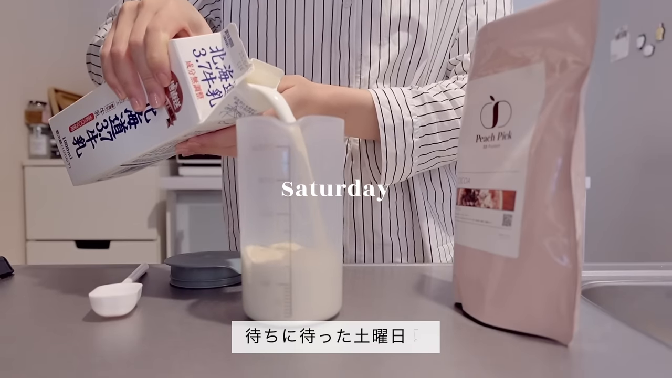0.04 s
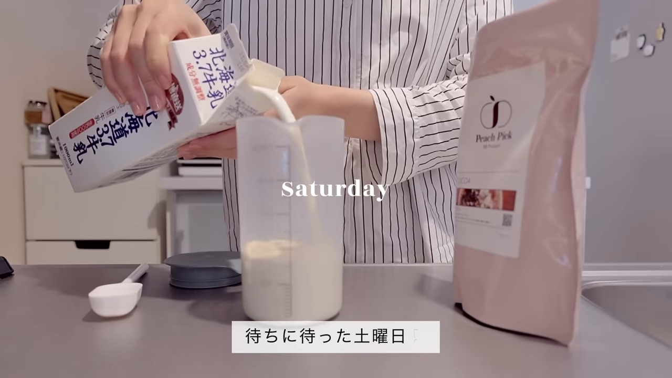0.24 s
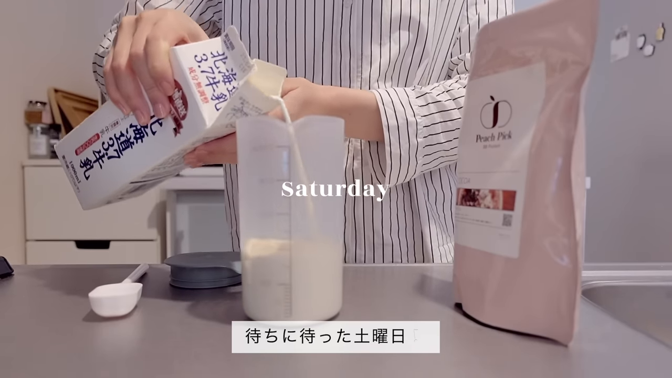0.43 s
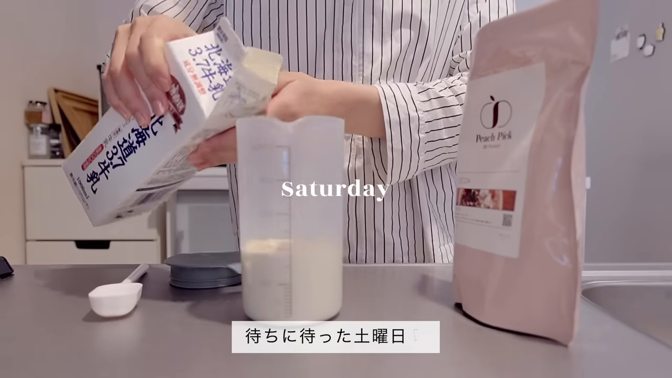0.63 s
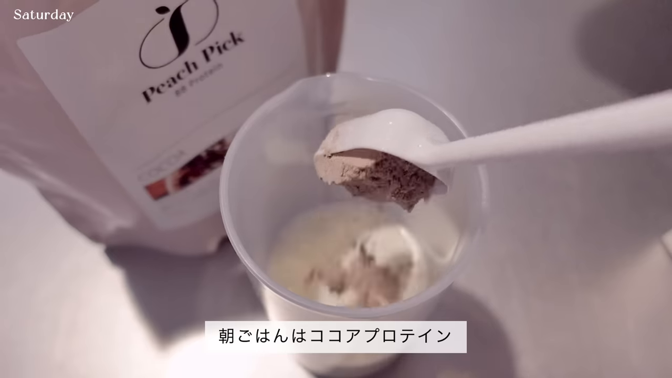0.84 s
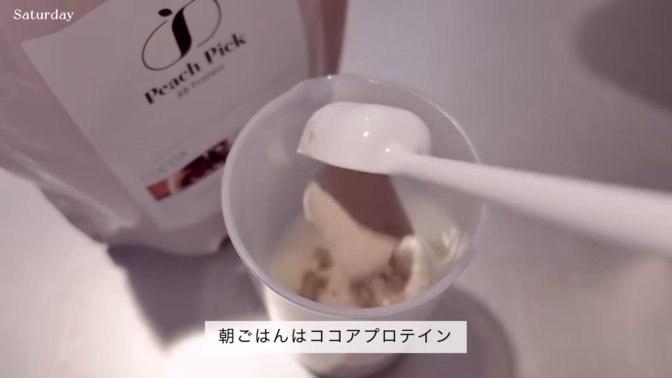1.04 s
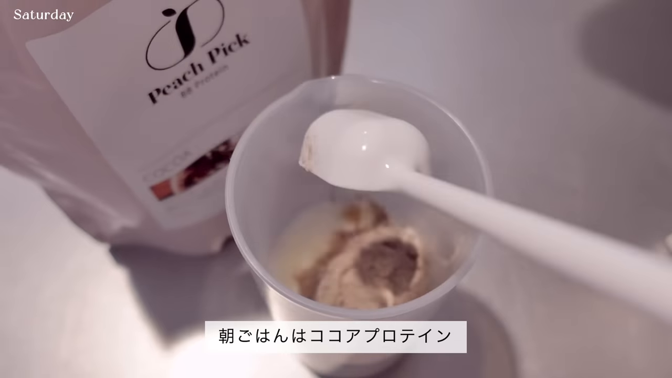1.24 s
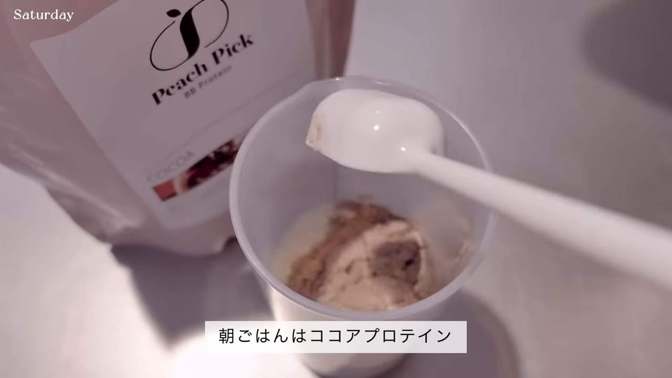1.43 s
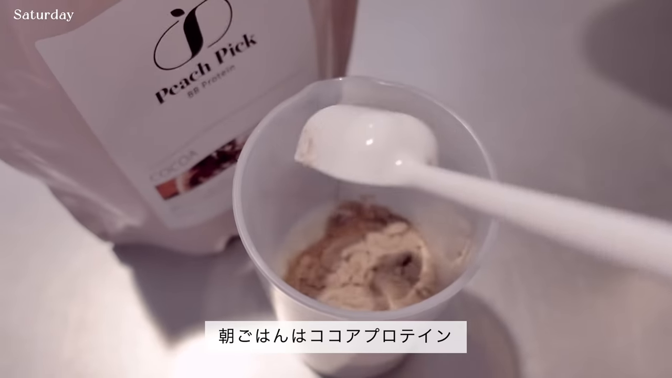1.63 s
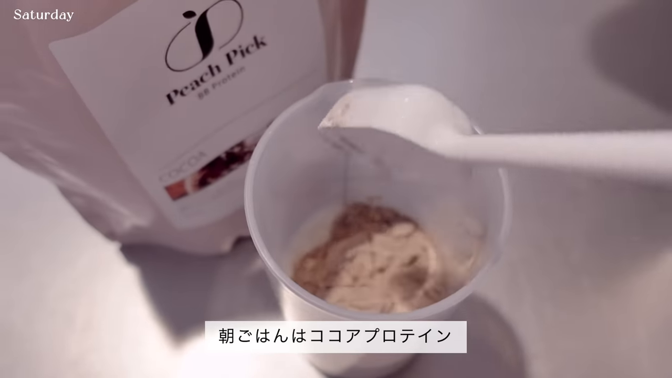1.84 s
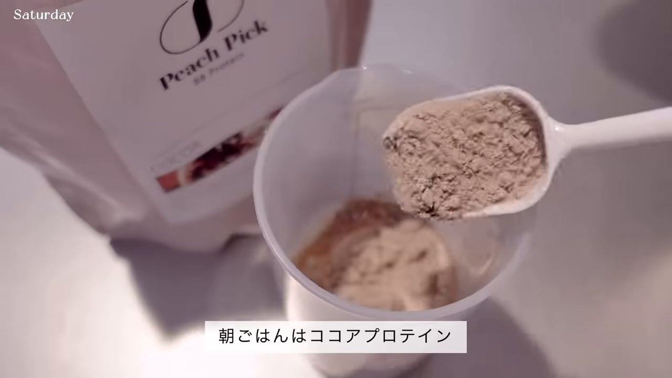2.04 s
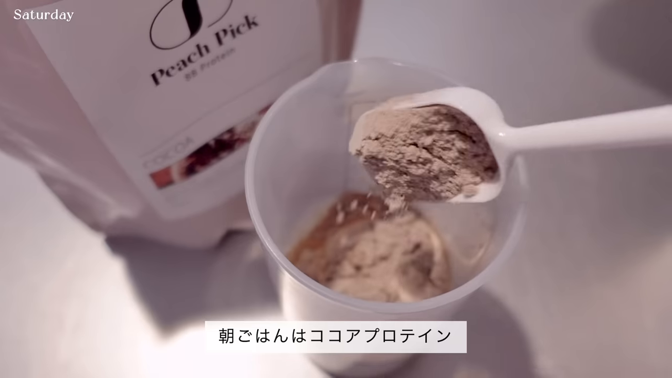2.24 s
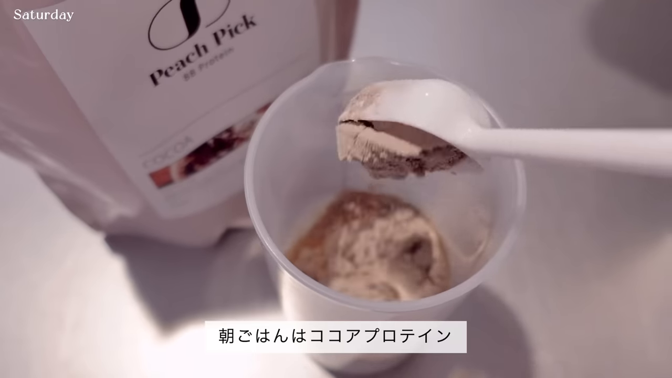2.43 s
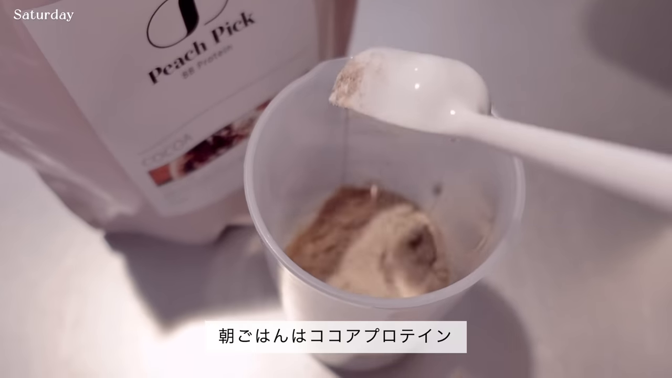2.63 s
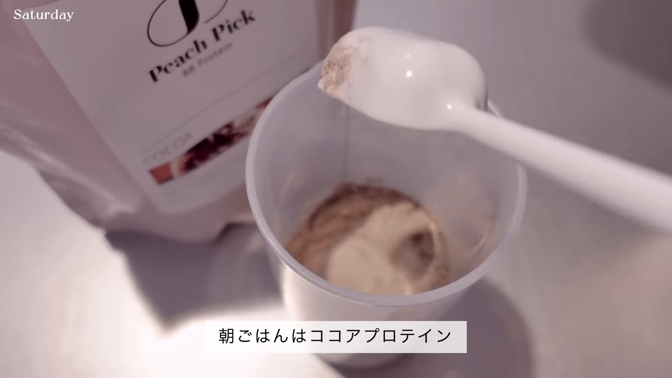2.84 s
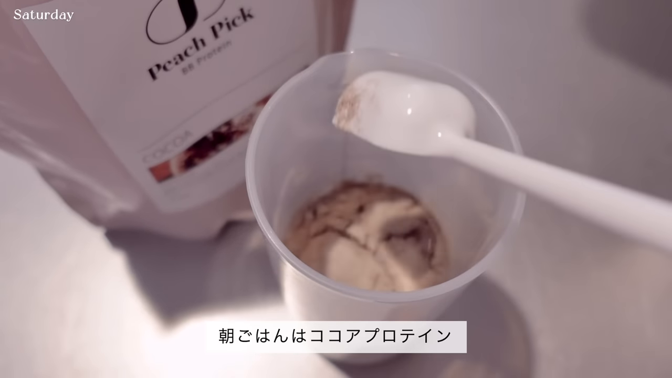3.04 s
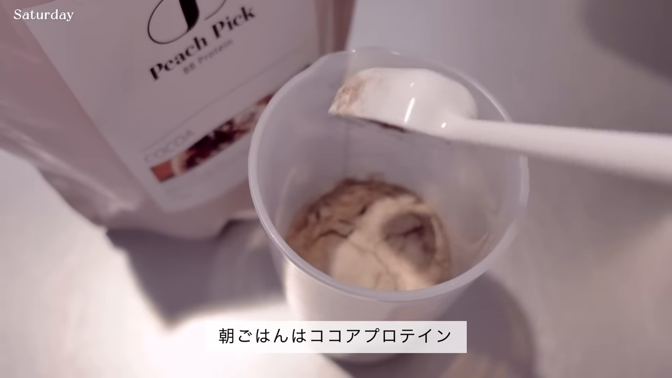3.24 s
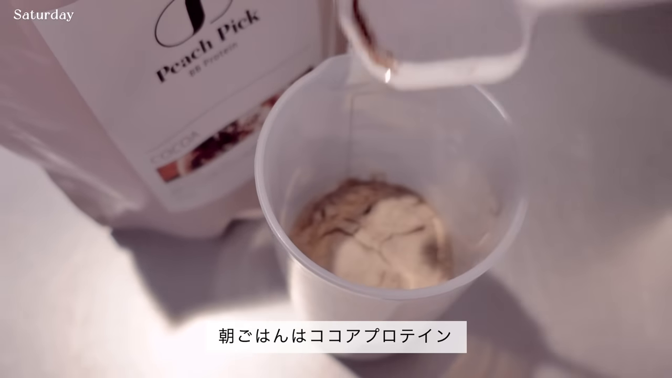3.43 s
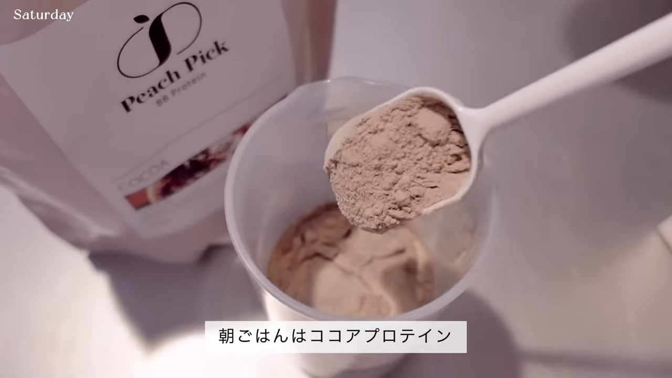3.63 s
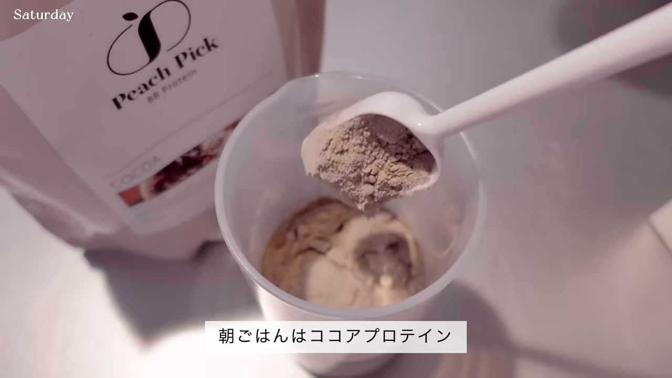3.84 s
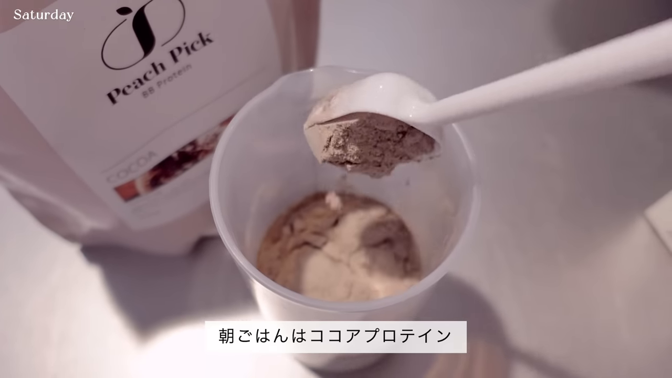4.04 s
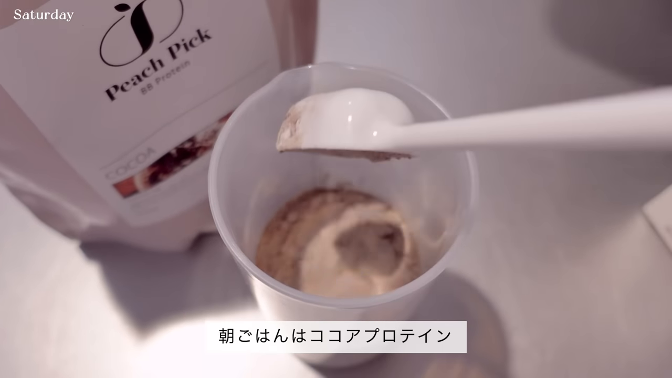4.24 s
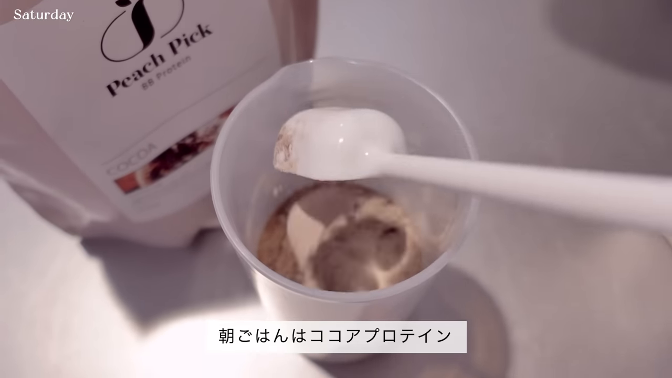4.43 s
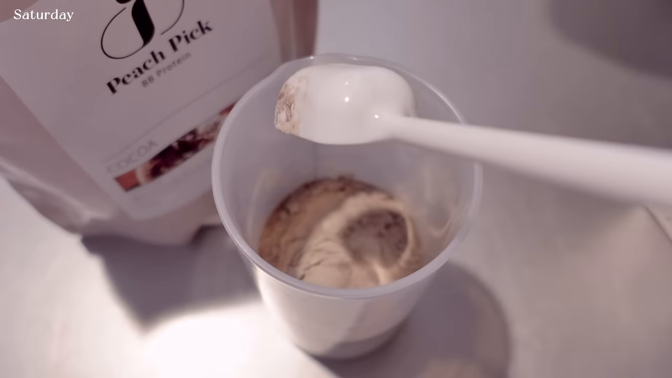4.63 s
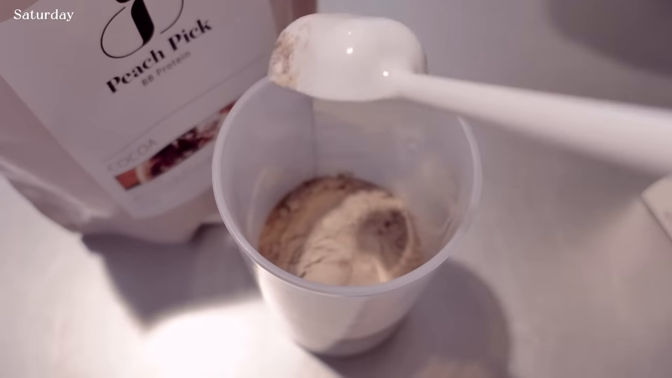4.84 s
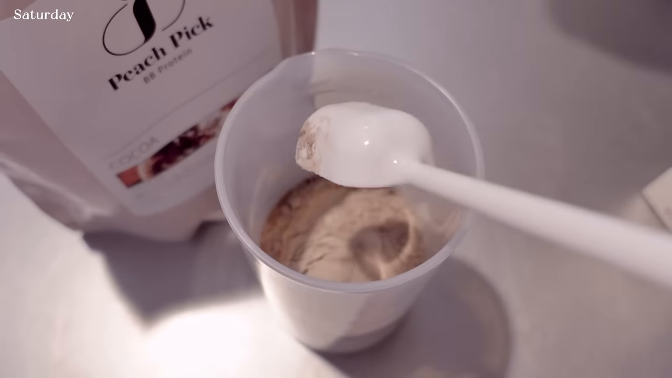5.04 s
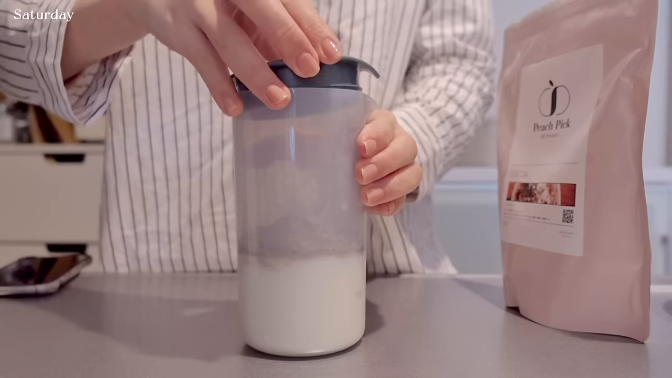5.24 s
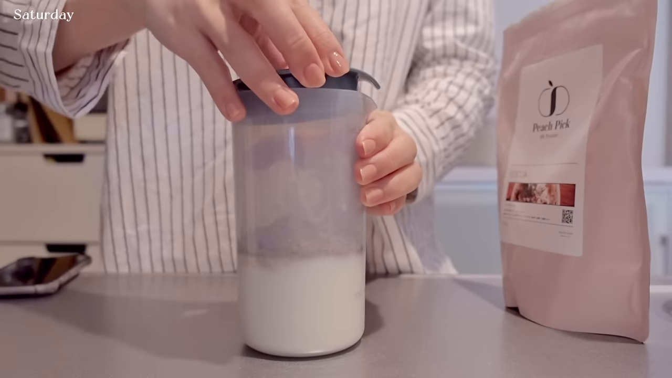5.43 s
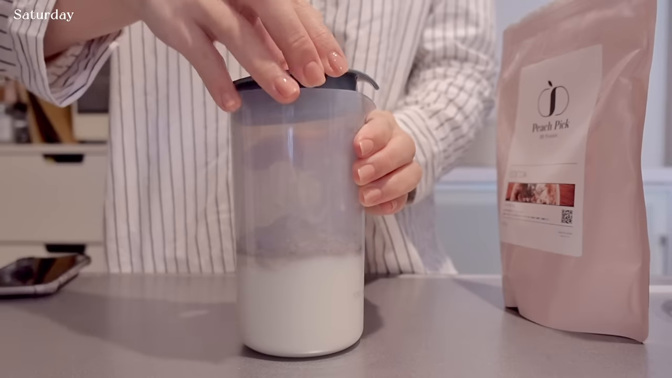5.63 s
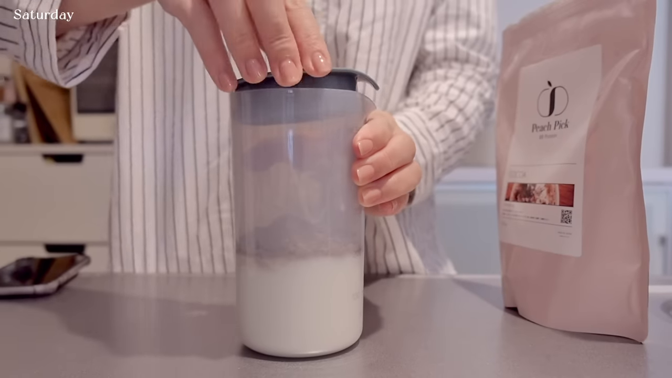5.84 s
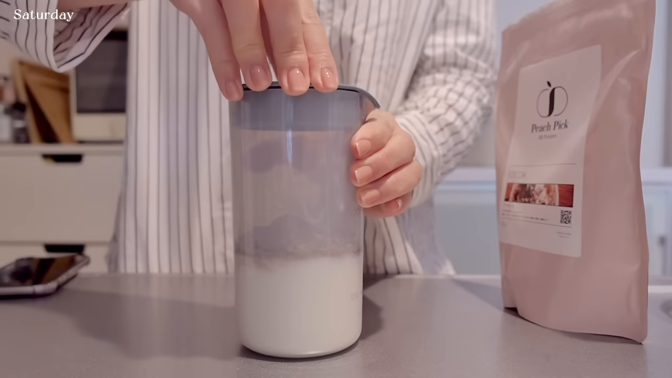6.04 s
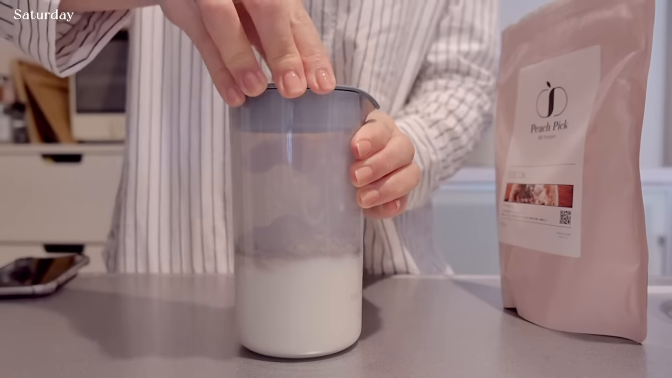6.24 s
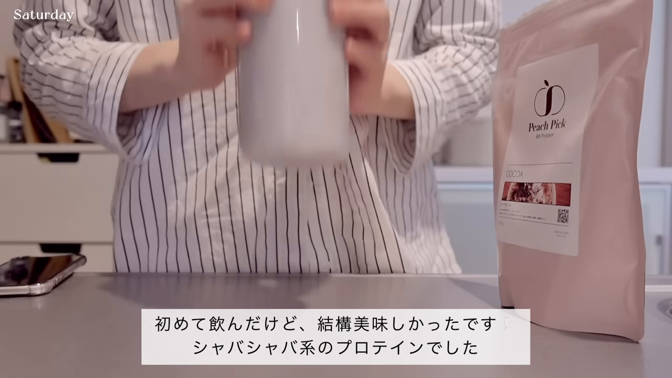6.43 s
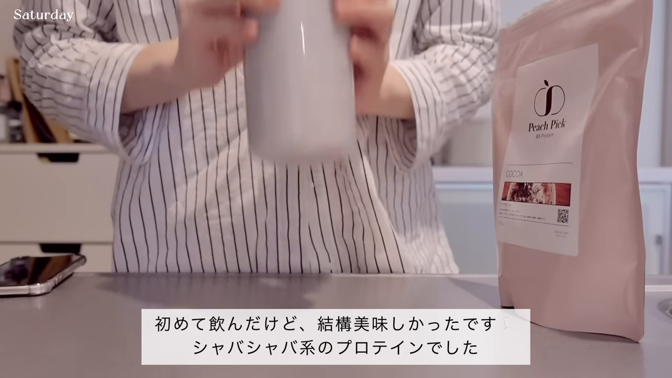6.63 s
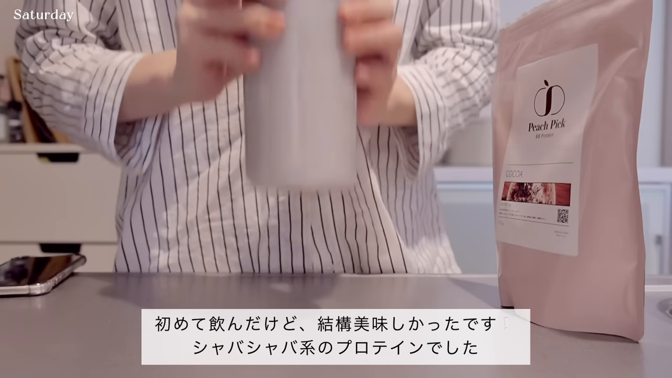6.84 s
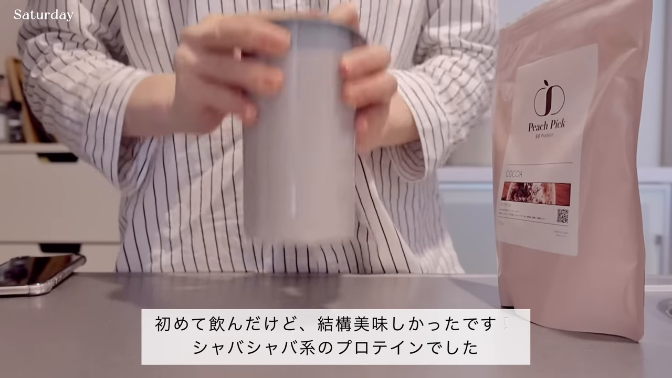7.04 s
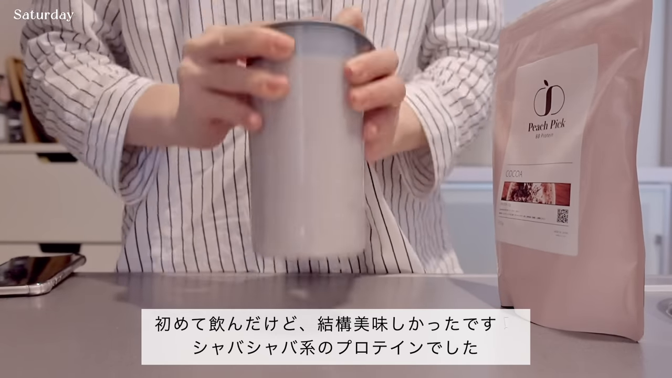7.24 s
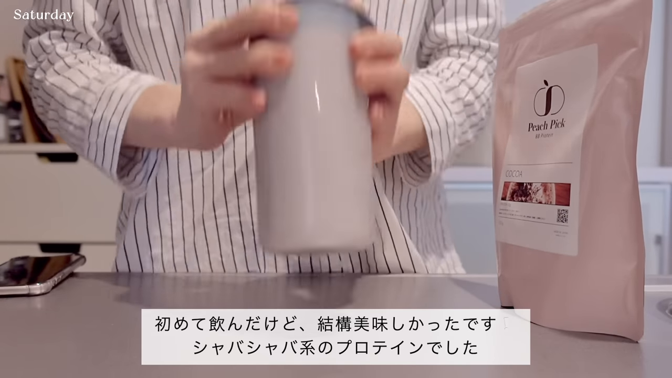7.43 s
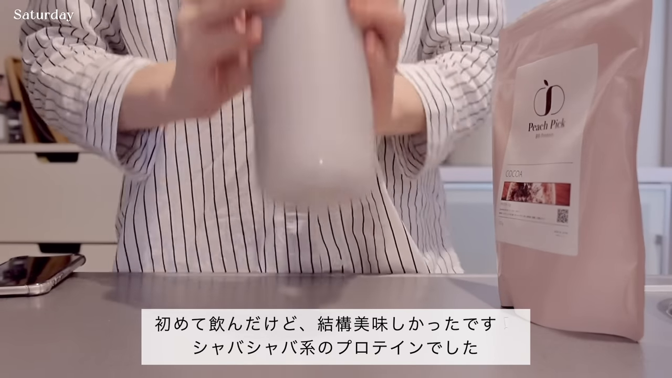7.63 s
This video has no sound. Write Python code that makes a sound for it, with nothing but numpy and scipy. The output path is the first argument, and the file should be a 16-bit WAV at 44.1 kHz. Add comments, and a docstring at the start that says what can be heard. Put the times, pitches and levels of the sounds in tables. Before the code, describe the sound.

Close, fairly dry sound in a small kitchen with faint steady room noise. From 0 to 0.6 s, a few tiny, high milk drips plink into a plastic cup, with a light carton click at 0.24. Dull taps and small clicks follow from 0.66; a hollow knock at 1.14 accompanies the first faint patter of powder. Soft low bumps of the jiggled scoop lead to a sharp, strong plastic snap at 2.05, a lesser one at 2.12. The second scoop brings hollow taps at 2.6 and a fuller knock at 2.85; the third, very faint, taps around 4.25 and 4.5. At 5.2 the lid knocks on, rubs quietly in its thread and thumps shut at 6.0. From 6.37 to the end near 7.7, loud shaking: nearly five hard strokes per second, with bright wet slaps, gulping air and spray, each answered by a softer, fizzy swing back.

```python
"""A protein drink is made on a kitchen counter. First the last milk drips into a plastic shaker cup: splashes
and tiny ringing bubbles. Then three scoops of powder patter in as fine grains, and the scoop is tapped empty
on the rim with snaps of plastic and hollow notes of the cup's air. The lid is set on, screwed down with stick
and slip rubs, and pressed shut. Last the cup is shaken hard, nearly five times a second: each time a strong
stroke and a softer, frothy swing back, made of spray, gulps of trapped air, fizz and slaps."""
import sys
import numpy as np
from scipy import signal
from scipy.io import wavfile
from scipy.ndimage import uniform_filter1d

SR = 44100
rng = np.random.default_rng(int(sys.argv[2]) if len(sys.argv) > 2 else 0)


def inscribe(sig):
    """Save sig as 16-bit PCM at rate SR to the path in sys.argv[1].

    A 1-D sig is mono; a 2-D sig holds one channel per row.
    Samples are clipped to [-1, 1] before scaling.
    """
    pcm = np.round(np.clip(np.atleast_2d(sig).T, -1, 1) * 32767)
    wavfile.write(sys.argv[1], SR, pcm.astype(np.int16))


N = 339570
TIME = np.arange(N) / SR
RING_TIME = TIME[:SR // 3]
BINS = np.fft.rfftfreq(4096, 1 / SR)  # frequencies at which filter curves are drawn, Hz

# colour of the liquid on the walls: [f/Hz, level/dB]
SPRAY_SPECTRUM = [(60, -70), (200, 1), (400, -8), (900, -8), (2000, -0.5), (3200, -7), (5000, -5.5),
                  (7500, -6.5), (9800, -19.5), (15500, -27)]
# colour of the fine fizz: [f/Hz, level/dB]
FIZZ_SPECTRUM = [(1000, -33), (3000, -9), (4500, 10), (7600, 1), (9800, -19), (15500, -18)]
SHAKE_START_S = 6.369


def shaking(churn_db=-47, churn_gulp_db=-54, spray_db=-3, gulp_db=-2, fizz_db=-4, gulp_briefness=0.93):
    """Each surge throws spray on the walls and squeezes the trapped air; the hardest ones slap."""
    # powers add: the surges ride on a steady churning
    spray_power, gulp_power, fizz_power = amp(churn_db) ** 2, amp(churn_gulp_db) ** 2, 0
    for surge, db, air_db, fine_db in surges():
        spray_power = spray_power + (amp(db) * surge) ** 2
        gulp_power = gulp_power + (amp(air_db) * surge ** gulp_briefness) ** 2
        fizz_power = fizz_power + (amp(fine_db) * surge) ** 2
    liquid = evened(colour(froth(), read(SPRAY_SPECTRUM, BINS))) + .85 * bubbles()
    droplets = evened(colour(crackle(per_s=5900, spread_db=3.0), read(FIZZ_SPECTRUM, BINS)))
    spray = amp(spray_db) * np.sqrt(spray_power) * liquid
    fizz = amp(fizz_db) * np.sqrt(fizz_power) * droplets
    gulps = amp(gulp_db) * np.sqrt(gulp_power) * air_pocket()
    shaken = TIME > SHAKE_START_S
    return cup_walls(shaken * (spray + fizz + splashes(liquid) + gulps) + slaps())


# strong strokes throw the drink against one end of the cup:
# [t/s at the crest, spray level/dB, rise/s, trapped-air gulp level/dB, splash f/Hz]
STRONG_STROKES = [(6.409, -27.5, 0.009, -28, 1100), (6.604, -25, 0.0063, -24.5, 1090),
                  (6.824, -25, 0.0095, -25, 805), (7.034, -25, 0.012, -27.5, 1620),
                  (7.266, -27.5, 0.0056, -26, 1250), (7.479, -26, 0.0025, -30.5, 1500),
                  (7.70, -38, 0.016, -32.5, 1900)]
# softer swings back: [t/s at the crest, spray level/dB, gulp level/dB]
SWINGS_BACK = [(6.478, -33, -60), (6.712, -33.5, -40), (6.935, -34.5, -47.5), (7.164, -35, -36.5),
               (7.364, -35.5, -36.5), (7.567, -35, -38)]
# rises and falls are time constants
STROKE_HOLD_S, STROKE_FALL_S = 0.0072, 0.023
RETURN_RISE_S, RETURN_HOLD_S, RETURN_FALL_S = 0.014, 0.027, 0.044
# fine fizz against the spray: the swing back is frothier (dB)
STROKE_FIZZ_DB, RETURN_FIZZ_DB = -14.5, -8


def surges():
    """Every surge of the drink as (envelope, spray dB, gulp dB, fizz dB)."""
    out = []
    for s, db, rise, air_db, _ in STRONG_STROKES:
        surge = held(s, s + STROKE_HOLD_S, rise, STROKE_FALL_S)
        out.append((surge, db, air_db, db + STROKE_FIZZ_DB))
    for s, db, air_db in SWINGS_BACK:
        surge = held(s, s + RETURN_HOLD_S, RETURN_RISE_S, RETURN_FALL_S)
        out.append((surge, db, air_db, db + RETURN_FIZZ_DB))
    return out


def splashes(liquid, level_db=-3, sharpness=1.1):
    """Each strong stroke brings out a broad band of the liquid's sound at its own pitch."""
    out = np.zeros(N)
    for s, db, rise, _, hz in STRONG_STROKES:
        ratio = (BINS + 1) / hz
        band_db = -10 * np.log10(1 + (sharpness * (ratio - 1 / ratio)) ** 2)
        surge = held(s, s + STROKE_HOLD_S, rise, STROKE_FALL_S)
        out += amp(db + level_db) * colour(surge * liquid, band_db)
    return out


def froth(count=24, cycles=1.4):
    """A cloud of bursting bubbles and droplets; each size comes in its own clumps."""
    out = np.zeros(N)
    for hz in np.geomspace(300, 14000, count):
        bursts = crackle(per_s=220 + hz / 9, spread_db=3.0) * flutter(depth_db=4, length_s=.02)
        burst_sound = pop(hz, cycles)[:SR // 20]
        out += np.sqrt(hz) * evened(signal.oaconvolve(bursts, burst_sound)[:N])
    return evened(out)


def bubbles(count=28, cycles=7, glide=0.036):
    """Larger bubbles ring for a few milliseconds, rising in pitch as they surface."""
    out = np.zeros(N)
    for hz in np.geomspace(450, 4800, count):
        age = RING_TIME[:SR // 8] * hz / cycles
        envelope = (1 - np.exp(-4 * age)) * np.exp(-age)
        plink = envelope * np.sin(2 * np.pi * cycles * age * (1 + glide * age / 2))
        out += evened(signal.oaconvolve(crackle(per_s=16, spread_db=3), plink)[:N])
    return evened(colour(out, read(SPRAY_SPECTRUM, BINS)))


# colour of the squeezed air: [f/Hz, level/dB]
GULP_SPECTRUM = [(60, -18.5), (240, -13.5), (340, -4), (440, 0), (530, -1), (700, -7), (1500, -30),
                 (4000, -96)]


def air_pocket(wander_db=1.2):
    """The trapped air keeps changing shape, so its hollow note wanders in pitch."""
    speed = flutter(depth_db=wander_db, length_s=.06)
    return evened(np.interp(np.cumsum(speed), np.arange(N), hiss(GULP_SPECTRUM)))


# hard slaps of the drink on the cup's ends: [t/s, thump level/dB, f/Hz, crack level/dB]
END_SLAPS = [(6.37, -35.5, 676, -43), (6.394, -19.5, 1300, -27), (6.602, -3, 1190, -20.5),
             (6.707, -43, 1800, -23.5), (6.822, -15, 534, -31), (6.826, -18.5, 960, -24),
             (6.937, -18.5, 1970, -24.5), (6.9602, -33, 2020, -19), (7.001, -22.5, 1800, -25),
             (7.025, -13, 1690, -22), (7.166, -17.5, 1810, -32), (7.256, -18.5, 1440, -23),
             (7.473, -6, 2100, -13), (7.4802, -5.5, 1520, -35), (7.562, -26, 1920, -29.5),
             (7.698, -15, 1870, -21.5)]
# colour of a slap's crack: [f/Hz, level/dB]
CRACK_SPECTRUM = [(150, -11), (1000, -8.5), (2400, -0.5), (4000, -8), (7600, -7), (9800, -18.5),
                  (15500, -25.5)]


def slaps(crack_db=-6):
    """The mass of drink hits an end of the cup: one short pressure swing and a noisy crack."""
    out = np.zeros(N)
    for s, db, hz, crack in END_SLAPS:
        add(out, s, amp(db) * pop(hz, cycles=0.49))
        add(out, s, amp(crack + crack_db) * tick(CRACK_SPECTRUM, decay_s=0.0039, onset_s=0.00031))
    return out


# resonances of the filled cup: [f/Hz, width/Hz, level/dB]
WALL_RESONANCES = [(950, 170, 5), (1050, 74, -2.5), (1260, 70, 1.5), (1650, 51, -4.5), (1710, 110, 3.5),
                   (1753, 59, -6.5), (2230, 170, 2), (4240, 230, 1)]


def cup_walls(x):
    """The walls lift or dip narrow bands, and a cup in the air radiates little bass."""
    walls_db = sum(db / (1 + (2 * (BINS - hz) / width) ** 2) for hz, width, db in WALL_RESONANCES)
    small_body_db = -10 * np.log10(1 + (170 / (BINS + 5)) ** 2)
    return colour(x, walls_db + small_body_db)


# the milk carton once, then the scoop's edge, click on the rim:
# [t/s, clack level/dB, hardness = snap over clack level/dB]
EDGE_CLICKS = [(0.2378, -47.5, -11), (0.8114, -49.5, -6), (0.9021, -47, -0.5), (1.03, -48.5, 3),
               (1.0474, -58, 8), (1.1342, -45, -12), (1.6468, -54.5, -4), (2.0503, -22, -4.5),
               (2.115, -33, -1.5), (2.6307, -54, 0), (2.6954, -55, 3.5), (2.8566, -37, 1),
               (2.9737, -37, 13), (4.1024, -69, 19), (4.2642, -48.5, -7), (4.5047, -49.5, 3.5),
               (4.9162, -51, -7)]
# dull taps of carton and scoop on the cup: [t/s, air ring level/dB, ring f/Hz, counter thud level/dB]
DULL_TAPS = [(0.6631, -58, 700, -45.5), (0.9021, -43, 732, -68), (1.1426, -24, 724, -38),
             (2.5722, -36, 744, -44.5), (2.5995, -36, 765, -48), (2.8445, -23, 680, -25.5),
             (2.975, -60, 700, -34), (4.2433, -32, 740, -38), (4.4576, -40.5, 790, -41.5)]


def scoop(tap_clack_db=-17, click_ring_db=-6, skip_db=-28, skip_thud_db=12, skip_fade_db=-1.5,
          skip_s=.03, count=5):
    """Hollow taps, and sharp clicks on the rim after which the plastic skips a few times, ever softer."""
    out = np.zeros(N)
    for s, db, hz, thud_db in DULL_TAPS:
        add(out, s, blow(db + tap_clack_db, hard_db=-6, ring_db=db, thud_db=thud_db, ring_hz=hz))
    for s, db, hard_db in EDGE_CLICKS:
        add(out, s, blow(db, hard_db, ring_db=db + click_ring_db, thud_db=db))
        delays = np.cumsum(skip_s * (.5 + rng.random(count)))
        for k, delay in enumerate(delays):
            soft_db = db + skip_db + k * skip_fade_db
            skip = blow(soft_db, hard_db=2.5, ring_db=soft_db + click_ring_db, thud_db=soft_db + skip_thud_db)
            add(out, s + delay, skip)
    return out


# ringing of the air in the open cup, main note first: [f/Hz, level/dB, t60/s]
CUP_AIR_MODES = [(686, -1, 0.04), (736, -9, 0.03), (825, -20, 0.066), (670, -40, 0.065), (1210, -5, 0.012),
                 (2170, -43, 0.028)]
# ringing of the counter: [f/Hz, level/dB, t60/s]
COUNTER_MODES = [(99, -6.5, 0.085), (140.5, -12.5, 0.21), (210.4, -1.5, 0.14), (297.6, 0, 0.14),
                 (354, 0, 0.095), (394, 1.5, 0.08), (534, -1, 0.079), (600, 5.5, 0.04)]


def blow(db, hard_db, ring_db, thud_db, ring_hz=CUP_AIR_MODES[0][0], rattle_db=-27):
    """A blow snaps the plastic, which rattles briefly, rings the air in the cup and thuds in the counter."""
    snap = plastic(db, hard_db, decay_s=0.0014)
    rattle = amp(rattle_db) * plastic(db, hard_db, decay_s=0.0084)
    pitch = ring_hz / CUP_AIR_MODES[0][0]
    air = [(hz * pitch, mode_db, t60) for hz, mode_db, t60 in CUP_AIR_MODES]
    hollow = amp(ring_db) * ring(air, contact_s=0.0024)
    return snap + rattle + hollow + amp(thud_db) * ring(COUNTER_MODES)


# the three voices of struck plastic, from flexing wall to hard edge, each: [f/Hz, level/dB]
CLACK_SPECTRUM = [(150, -10), (700, 1), (1200, -7), (2200, 6.5), (3300, -0.5), (4300, -1), (6500, -44),
                  (10000, -34)]
SNAP_SPECTRUM = [(500, -57), (2500, -9.5), (4300, -1), (5100, 9), (6200, 11), (7600, 7.5), (8700, -2.5),
                 (9800, -20), (15500, -13)]
EDGE_SPECTRUM = [(3000, -2), (9300, -17), (11000, -7), (12800, -18), (14500, -12), (16000, -36)]


def plastic(db, hard_db, decay_s, edge_db=-17, edge_growth=1.45):
    """Struck plastic: the harder the contact, the more of its upper voices sound."""
    voices = [(0, CLACK_SPECTRUM), (hard_db, SNAP_SPECTRUM), (edge_db + edge_growth * hard_db, EDGE_SPECTRUM)]
    return sum(amp(db + voice_db) * tick(voice, decay_s) for voice_db, voice in voices)


# lid against the cup: [t/s, clack level/dB, hardness = snap over clack level/dB, thump level/dB]
LID_CONTACTS = [(5.1815, -41.5, -10, -28), (5.2906, -55, 13, -41), (5.8845, -62, 17, -30),
                (5.901, -46.5, 19, -46), (5.9946, -28.5, -0.5, -8.5), (6.133, -46.5, -2, -42.5)]
# ringing of the closed cup: [f/Hz, level/dB, t60/s]
CLOSED_CUP_MODES = [(117, -12, 0.098), (216, 4, 0.069), (280, 10.5, 0.025), (343, -18, 0.18),
                    (440, -10, 0.02), (623, -7, 0.051), (1426, -7.5, 0.021)]


def lid(push_db=-18):
    """The lid knocks on the cup and is screwed down by a rustling hand."""
    out = thread() + grip()
    for s, db, hard_db, thump_db in LID_CONTACTS:
        add(out, s, plastic(db, hard_db, decay_s=0.0021))
        add(out, s, amp(thump_db) * ring(CLOSED_CUP_MODES, contact_s=0.0028))
        # the hand's weight pushes into the counter
        add(out, s, amp(thump_db + push_db) * pop(hz=124, cycles=0.57))
    return out


# rubs of the lid turning in its thread: [t/s at the crest, level/dB, rise plus fall time constant/s]
THREAD_RUBS = [(5.192, -44.5, 0.015), (5.297, -41.5, 0.032), (5.40, -55, 0.04), (5.485, -56, .04),
               (5.636, -49.5, 0.036), (5.738, -53.5, 0.039), (5.931, -44, 0.064), (5.977, -36, .04),
               (6.068, -50, 0.044), (6.21, -57.5, .05)]
# colour of the slips in the thread: [f/Hz, level/dB]
THREAD_SPECTRUM = [(200, -38), (1000, -12), (2500, -11), (3500, -20), (4700, -9.5), (5700, -4), (6700, -7),
                   (7800, -0.5), (9300, -12.5), (11000, -14.5), (15500, -23)]
# colour of the low rumble under the rubs: [f/Hz, level/dB]
RUMBLE_SPECTRUM = [(50, -40), (130, -15), (230, 5.5), (450, -5), (700, -14), (1500, -19), (5000, -57)]
RUB_RISE_SHARE = 0.41


def thread(rumble_db=-4):
    """The thread sticks and rubs in many tiny slips over a low rumble."""
    power = 0
    for s, db, length in THREAD_RUBS:
        rub = swell(s, length * RUB_RISE_SHARE, length * (1 - RUB_RISE_SHARE))
        power = power + (amp(db) * rub) ** 2
    slips = evened(colour(crackle(per_s=5300, spread_db=3.0), read(THREAD_SPECTRUM, BINS)))
    slips = slips * flutter(depth_db=3.5, length_s=.012)
    return np.sqrt(power) * (slips + amp(rumble_db) * hiss(RUMBLE_SPECTRUM))


# the hand rests on the lid: [start t/s, end t/s]
HAND_ON_LID = (5.2, 6.37)
# the hand's faint rustle on the cup: [f/Hz, level/dB]
RUSTLE_SPECTRUM = [(100, -11), (220, 1), (330, -4.5), (452, 5), (650, -11.5), (1660, -10.5), (3500, -17),
                   (6000, -13), (15000, -30.5)]


def grip(grip_db=-58):
    """Skin on plastic: a faint, slightly uneven noise while the hand rests there."""
    resting = held(*HAND_ON_LID, rise=.008, fall=0.023)
    return amp(grip_db) * resting * flutter(depth_db=0.5, length_s=0.055) * hiss(RUSTLE_SPECTRUM)


# each scoopful slides into the cup: [start t/s, end t/s, patter level/dB, hollow tone level/dB]
SCOOPFULS = [(0.87, 1.27, -68.5, -63.5), (2.245, 2.68, -72, -67.5), (3.557, 4.202, -78, -62)]
# colour of the grains: [f/Hz, level/dB]
GRAIN_SPECTRUM = [(300, -47), (1500, -4), (4000, -0.5), (7800, 1), (9500, -8), (15500, -52)]
POUR_RISE_S, POUR_FALL_S = 0.18, 0.064  # time constants


def powder():
    """Fine grains patter into the cup."""
    flow = sum(amp(db) * held(start, end, POUR_RISE_S, POUR_FALL_S) for start, end, db, _ in SCOOPFULS)
    grains = evened(colour(crackle(per_s=900, spread_db=-0.5), read(GRAIN_SPECTRUM, BINS)))
    return flow * flutter(depth_db=8, length_s=0.034) * grains


# colour of the air in the open cup: [f/Hz, level/dB]
HOLLOW_SPECTRUM = [(300, -92), (580, -34.5), (625, 12.5), (645, 26), (675, 8), (720, -36), (1400, -33.5)]


def hollow_tone():
    """The faint, uneven tone of the air in the open cup during each pour."""
    tone = sum(amp(db) * held(start, end, POUR_RISE_S, POUR_FALL_S) for start, end, _, db in SCOOPFULS)
    return tone * flutter(depth_db=4.5, length_s=.04) * hiss(HOLLOW_SPECTRUM)


# the scoop is jiggled to loosen the powder:
# [start t/s, end t/s, mean spacing of bumps/s, level at start/dB, level at end/dB]
SCOOP_JIGGLES = [(1.196, 1.47, .076, -40, -51), (1.689, 2.04, .065, -48, -46.5)]
# the cup is nudged on the counter: [t/s, level/dB]
CUP_NUDGES = [(3.68, -46), (3.984, -52)]


def handling(bump_hz=151, nudge_hz=70):
    """Soft low pressure swings of the jiggled scoop and the nudged cup."""
    out = np.zeros(N)
    for start, end, step, first_db, last_db in SCOOP_JIGGLES:
        for s in np.arange(start, end, step):
            late, uneven_db = rng.uniform(-1, 1, 2) * [.007, 2]  # s, dB
            db = np.interp(s, [start, end], [first_db, last_db]) + uneven_db
            add(out, s + late, amp(db) * pop(bump_hz, cycles=1.27))
    for s, db in CUP_NUDGES:
        add(out, s, amp(db) * pop(nudge_hz, cycles=0.38))
    return out


# milk drips: [t/s, level/dB, bubble f/Hz]
MILK_DRIPS = [(0.0787, -39.5, 4790), (0.2, -53, 2350), (0.2116, -46.5, 4900), (0.2196, -40, 3690),
              (0.474, -42.5, 5550), (0.4744, -44, 3570), (0.565, -52, 2300), (0.5715, -39.5, 7550),
              (0.581, -45, 8200)]


def milk(level_db=-2, cycles=5.8, splash_db=-7):
    """Each drip splashes and traps a tiny bubble that rings."""
    out = np.zeros(N)
    for s, db, hz in MILK_DRIPS:
        splash = tick([(hz / 4, -20), (hz, 0), (hz * 2, -16)], decay_s=0.0021)
        add(out, s, amp(db + level_db) * pop(hz, cycles) + amp(db + splash_db) * splash)
    return out


# colour of the room's steady background: [f/Hz, level/dB]
AMBIENCE_SPECTRUM = [(15, -10), (25, 1), (137, -4.5), (249, -4), (363, -7), (451, -5), (516, -10.5),
                     (560, -8), (840, -11), (1230, -14), (2410, -19), (2910, -19.5), (3160, -21.5),
                     (16000, -26.5)]
AMBIENCE_DB = -60


def ambience():
    """A steady, quiet noise behind everything."""
    return amp(AMBIENCE_DB) * hiss(AMBIENCE_SPECTRUM)


# the kitchen's decay: [f/Hz, t60/s]
KITCHEN_DECAY = [(150, 0.23), (400, 0.25), (1200, 0.28), (3000, 0.34), (8000, .2), (15000, 0.033)]
# early echoes from counter and cupboards: [delay t/s, relative gain]
EARLY_ECHOES = [(.0017, 0.053), (.0052, 0.17), (.0087, 0.26), (0.0139, .18), (0.0193, 0.15)]


def kitchen(x, echo_db, tail_db):
    """Direct sound, a few early echoes and a short tail that dies fastest in the high treble."""
    hz, t, z = signal.stft(rng.standard_normal(SR // 2), SR, nperseg=256)
    decay = amp(-60 * t / read(KITCHEN_DECAY, hz)[:, None])
    tail = signal.istft(z * decay, SR)[1]
    tail = tail * np.minimum(TIME[:len(tail)] / 0.0031, 1)  # fades in over 3.1 ms
    response = amp(tail_db) * tail / np.linalg.norm(tail)
    add(response, 0, np.ones(1))  # direct sound
    for s, gain in EARLY_ECHOES:
        add(response, s, np.array([amp(echo_db) * gain]))
    return signal.oaconvolve(x, response)[:N]


def ring(modes, detune=0.016, contact_s=0.0013):
    """A struck body: dying sines, a little different at every blow; the air follows their rate of change."""
    t = RING_TIME
    motion = 0
    for hz, db, t60 in modes:
        struck_hz = hz * (1 + detune * (2 * rng.random() - 1))
        motion = motion + amp(db - 60 * t / t60) * np.sin(2 * np.pi * struck_hz * t) / hz
    contact = 1 - np.exp(-t / contact_s)
    return peaked(np.diff(motion * contact, prepend=0))


def pop(hz, cycles):
    """A short pressure swing whose envelope crests after the given cycles, then dies."""
    u = RING_TIME * hz / cycles
    return u * np.exp(1 - u) * np.sin(2 * np.pi * hz * RING_TIME)


def tick(spectrum, decay_s, onset_s=0.00039):
    """A short chatter of contacts with the given spectrum."""
    t = RING_TIME
    chatter = rng.choice([-1, 1], len(t)) * np.exp(-t / decay_s) * (1 - np.exp(-t / onset_s))
    x = colour(chatter, read(spectrum, BINS))
    return x / np.sqrt(np.sum(x ** 2) / (SR * decay_s))


def hiss(spectrum):
    """Steady noise of rms 1 with the given spectrum."""
    return evened(colour(rng.standard_normal(N), read(spectrum, BINS)))


def crackle(per_s, spread_db):
    """Random clicks of either sign; a positive spread makes a few stand out, a negative one a few softer."""
    size = amp(spread_db * np.minimum(rng.exponential(1, N), 4))
    return evened(size * rng.choice([-1, 1], N) * (rng.random(N) < per_s / SR))


def flutter(depth_db, length_s):
    """An uneven gain that wanders by chance, smoothed over length_s."""
    knots = np.arange(0, TIME[-1] + 1, .002)
    width = max(round(length_s / knots[1]), 1)
    wobble = uniform_filter1d(rng.standard_normal(len(knots)), width)
    return evened(amp(depth_db * np.interp(TIME, knots, evened(wobble))))


def held(start, end, rise, fall):
    """An envelope that climbs to 1, holds from start to end and dies away."""
    before, after = (start - TIME) / rise, (TIME - end) / fall
    return np.exp(-np.maximum(np.maximum(before, after), 0))


def swell(s, rise, fall):
    """An envelope that climbs to 1 at time s and dies away."""
    return held(s, s, rise, fall)


def colour(x, curve_db):
    """Causal minimum-phase filter with the given gain at each of BINS."""
    log_gain = np.log(amp(np.r_[curve_db, curve_db[-2:0:-1]]))
    taps = np.fft.ifft(np.exp(np.conj(signal.hilbert(log_gain)))).real
    return signal.oaconvolve(x, taps)[:len(x)]


def read(points, hz):
    """Reads a table on a log-frequency axis."""
    f, value = np.transpose(points)
    return np.interp(np.log(hz + 1), np.log(f + 1), value)


def add(mix, s, sound):
    """Mixes a sound in at time s."""
    part = mix[max(round(s * SR), 0):][:len(sound)]
    part += sound[:len(part)]


def amp(db):
    """Decibels to gain."""
    return 10 ** (np.asarray(db) / 20)


def evened(x):
    """Scales to rms 1."""
    return x / np.sqrt(np.mean(x ** 2) + 1e-20)


def peaked(x):
    """Scales to peak 1."""
    return x / np.max(abs(x))


def scene():
    """The scoop and the shaking are heard fairly dry; the milk and the lid carry a stronger room tail."""
    sloshing = kitchen(shaking(), echo_db=-12.5, tail_db=-17.5)
    scooping = kitchen(scoop() + powder() + hollow_tone() + handling(), echo_db=-7.5, tail_db=-17)
    closing = kitchen(lid(), echo_db=-26.0, tail_db=-7.5)
    dripping = kitchen(milk(), echo_db=-7, tail_db=-12.5)
    return (sloshing + scooping + closing + dripping + ambience())[None]


EDGE_HZ = 16100


def record(dry):
    """The recorder's band limit: a steep lowpass at EDGE_HZ."""
    lowpass = signal.firwin(511, EDGE_HZ, window=("kaiser", 9), fs=SR)
    return signal.oaconvolve(dry, lowpass[None], "same")


dry = scene()
out = record(dry)
inscribe(out)
```